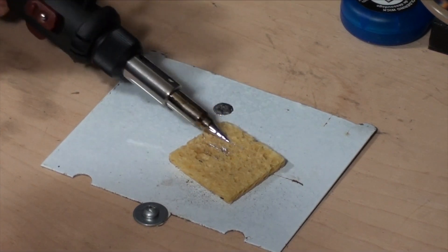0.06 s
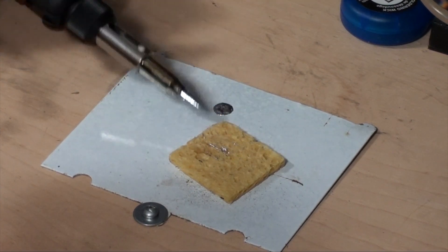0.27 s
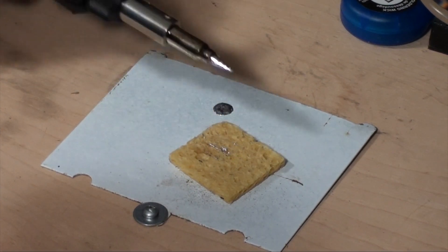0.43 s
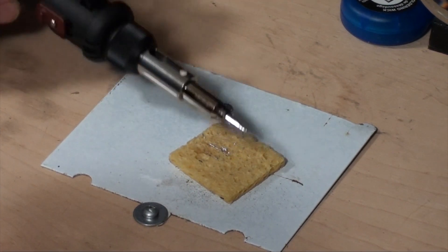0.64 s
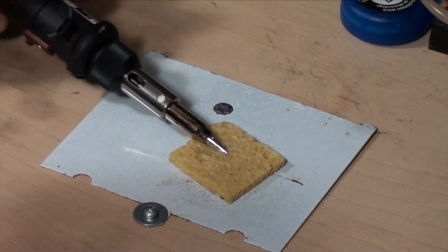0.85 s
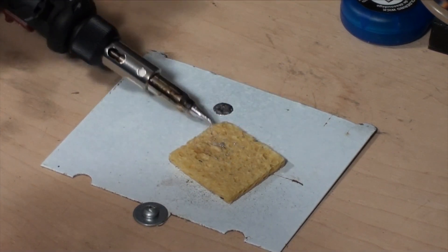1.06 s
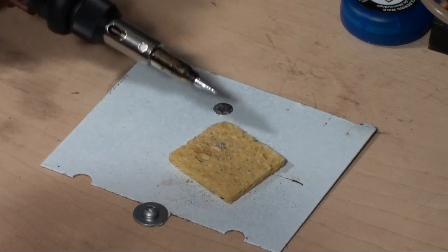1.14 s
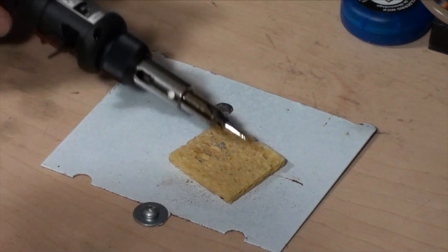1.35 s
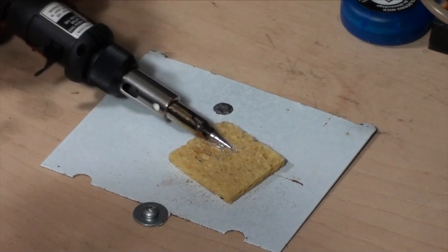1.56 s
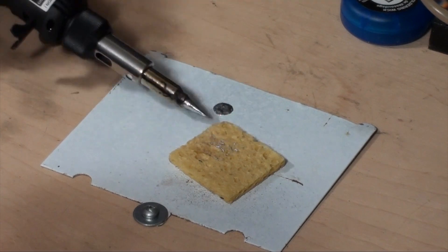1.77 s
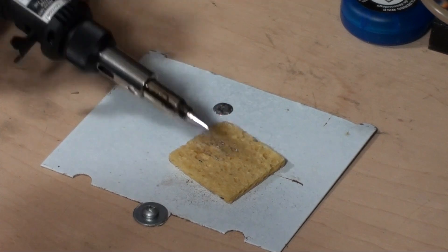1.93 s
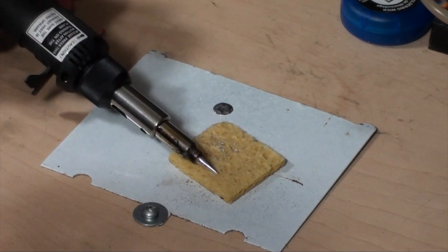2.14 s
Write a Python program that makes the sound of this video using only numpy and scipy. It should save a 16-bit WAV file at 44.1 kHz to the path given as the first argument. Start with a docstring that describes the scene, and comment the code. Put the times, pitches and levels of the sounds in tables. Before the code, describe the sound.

A hot soldering iron tip sizzles on a damp sponge, close up in a small, dry room. The first wipe ends at 0.2 seconds with a sharp, briefly ringing metal knock and a low workbench thump. Sizzling returns from 0.8 to 1.1 with tiny spits, louder from 1.45 to 1.75 with soft rubbing, and briefly at 2.1. A gas burner hisses and hums faintly throughout.

```python
"""Water sizzles into steam as the hot tip of a gas soldering iron is wiped four times over a damp sponge.
Thousands of tiny bursts make the sizzle; single drops spit, and the tip rubs through the third stroke.
After the first stroke the tip slips off and knocks on the plate under the sponge: iron and plate ring,
and the workbench thumps. The burner hisses and hums faintly throughout, in a small, dry room."""
import sys
import numpy as np
from scipy import signal
from scipy.fft import rfft, irfft
from scipy.io import wavfile
from scipy.ndimage import uniform_filter1d

SR = 44100
rng = np.random.default_rng(int(sys.argv[2]) if len(sys.argv) > 2 else 0)


def unload_audio(sound):
    """Save the sound as a 16-bit wav file, at the path given as the first command line argument."""
    columns = np.transpose(np.atleast_2d(sound))
    # keep every value between -1 and 1, then stretch to whole-number steps
    steps = np.round(np.clip(columns, -1, 1) * 32767)
    wavfile.write(sys.argv[1], SR, steps.astype(np.int16))


N = 97020

# The tip's contacts with the plate, a graze and then the blow. Each row: start in seconds, gain in dB.
KNOCK_CONTACTS = [(.2212, -26), (0.2251, -7), (0.2249, 2.5)]
BLOW_S = KNOCK_CONTACTS[-1][0]


def undb(db):
    """Decibels to gain."""
    return 10 ** (np.asarray(db) / 20)


def unit(x):
    """Scale to rms 1."""
    return x / np.sqrt(np.mean(x ** 2))


def since(start):
    """Seconds since a moment, zero before it."""
    return np.maximum(np.arange(N) / SR - start, 0)


def fade(start, t60):
    """Sudden onset and exponential decay."""
    return (since(start) > 0) * np.exp(-np.log(1000) * since(start) / t60)


def curve(points):
    """Join (seconds, value) points by straight lines."""
    return np.interp(since(0), *np.array(points).T)


def drift(rate_hz):
    """Smooth random movement; rms 1."""
    span = max(int(SR / rate_hz), 2)
    return unit(uniform_filter1d(uniform_filter1d(rng.standard_normal(N), span), span))


def colour(x, points, peaks=()):
    """EQ a sound by (Hz, dB) points plus (centre Hz, width Hz, dB) resonances; rms 1."""
    freqs = np.maximum(np.fft.rfftfreq(N, 1 / SR), 1)
    hz, db = np.array(points).T
    power = undb(np.interp(np.log(freqs), np.log(hz), db)) ** 2
    for centre, width, peak_db in peaks:
        power += undb(peak_db) ** 2 / (1 + ((freqs - centre) / width) ** 2 * 2) ** 2
    return unit(irfft(rfft(x) * np.sqrt(power), N))


def band(hz, width_hz):
    """Noise in one resonance; rms 1."""
    b, a = signal.iirpeak(hz, hz / width_hz, fs=SR)
    return unit(signal.lfilter(b, a, signal.lfilter(b, a, rng.standard_normal(N))))


def ring(modes, start):
    """Decaying modes set off at one moment."""
    phases = 2 * np.pi * rng.random(len(modes))
    return sum(undb(db) * fade(start, t60) * np.sin(2 * np.pi * hz * since(start) + phase)
               for (hz, db, t60), phase in zip(modes, phases))


def room(x, pan_db):
    """Panned direct sound plus the short, duller wash of the room in each ear."""
    lag_s, top_hz, wash_db = 0.0067, 5600, -19
    b, a = signal.butter(1, top_hz, fs=SR)
    tails = signal.lfilter(b, a, rng.standard_normal((2, N))) * fade(lag_s, t60=0.14)
    wash = signal.fftconvolve(np.atleast_2d(x), unit(tails) / np.sqrt(N), axes=1)[:, :N]
    return x * undb(np.array([[pan_db], [-pan_db]]) / 2) + undb(wash_db) * wash


def gas_hiss():
    """Even gas hiss in the middle over diffuse room noise."""
    # EQ of the centre and of the sides. Each row: frequency in Hz, relative level in dB.
    mid_eq = [(20, -7), (45, -12.5), (150, -8), (300, -9.5), (520, -10), (700, -11.5), (1000, -12),
              (2300, -15), (3000, -16), (5400, -14.5), (10000, -18), (15500, -18)]
    side_eq = [(25, -33), (120, -18), (260, -9.5), (600, -7), (1200, -9), (2500, -13.5), (5000, -19.5),
               (9000, -24), (15000, -44)]
    mid = undb(-57) * colour(rng.standard_normal(N), mid_eq)
    side = undb(-62.5) * colour(rng.standard_normal(N), side_eq)
    return np.array([mid + side, mid - side])


def burner_hum():
    """A faint, slightly wavering tone and its third harmonic, like a closed pipe."""
    # The two partials. Each row: frequency in Hz, base level in dB.
    partials = [(839.4, -69), (2517.4, -68.5)]
    # Swell of the lower partial. Each row: time in seconds, gain in dB.
    swell = [(0, -11), (.4, -1.5), (1.3, 2.5), (2.2, 1)]
    pitch_wander, waver_db = 0.00103, -0.9
    clock = np.cumsum(1 + pitch_wander * drift(rate_hz=4.5)) / SR
    low, high = (undb(db + waver_db * drift(rate_hz=13)) * np.sqrt(2) * np.sin(2 * np.pi * hz * clock)
                 for hz, db in partials)
    return low * undb(curve(swell)) + high


def bench_thump():
    """The bench answers the knock with a low thump that builds over a few milliseconds."""
    # Modes of the bench. Each row: frequency in Hz, level in dB, T60 in seconds.
    bench_modes = [(144, -34.5, 0.18), (132, -53, 0.19), (113.7, -56, 0.6), (61.6, -56, .2)]
    lag_s, rise_s = 0.0024, 0.013
    start = BLOW_S + lag_s
    return ring(bench_modes, start) * (1 - np.exp(-since(start) / rise_s))


def contact_crack():
    """Each contact of tip and plate is a snap of bright noise, slightly different in each ear."""
    # EQ of the crack. Each row: frequency in Hz, relative level in dB.
    crack_eq = [(300, -35), (1100, -21), (1800, -53), (2300, -8), (2900, -17), (3200, -35), (3600, -11),
                (4800, -7), (5200, -22), (7500, -20), (9000, -25), (11200, -24), (13300, -13), (16000, -27)]
    # Its broad resonances. Each row: centre in Hz, width in Hz, relative level in dB.
    crack_peaks = [(4220, 420, -1.5), (5470, 210, -15), (6430, 450, 4.5), (8420, 290, 6), (9470, 150, -15),
                   (10100, 430, -5), (12130, 260, -9)]
    trim_db, side_db = -18, -17
    mid, side = (colour(rng.standard_normal(N), crack_eq, crack_peaks) for _ in range(2))
    stereo = mid + undb(side_db) * side * np.array([[1], [-1]])
    return stereo * sum(undb(db + trim_db) * fade(start, t60=0.016) for start, db in KNOCK_CONTACTS)


def knock():
    """The tip cracks on the plate; the iron rings and rattles briefly, and the plate clacks hollowly."""
    # EQ of the rattle. Each row: frequency in Hz, relative level in dB.
    rattle_eq = [(300, -32.5), (550, -10.5), (750, -20.5), (1400, -4), (1900, -16.5), (3200, -6.5),
                 (3700, -4), (5000, -13), (5900, -5.5), (6400, 4), (7500, -10.5), (8300, -2.5), (9100, -20),
                 (10400, -4), (11300, -19), (12300, -13), (16000, -30)]
    # Modes of the iron and of the plate. Each row: frequency in Hz, relative level in dB, T60 in seconds.
    iron_modes = [(3650, -31.5, .06), (4135, -31.5, 0.064), (4810, -34.5, 0.086), (5260, -43.5, 0.17),
                  (5590, -34, 0.11), (6342, -33, .15), (6534, -36.5, 0.15), (6790, -43, .07),
                  (7840, -33, 0.085), (8400, -34.5, 0.11), (8360, -25, .055), (9380, -33.5, 0.067),
                  (10350, -34, 0.085), (12400, -38, 0.052)]
    plate_modes = [(532, -53, 0.32), (593, -39.5, 0.054), (939, -42.5, 0.097), (1020, -46.5, 0.044),
                   (1140, -38, 0.04), (1260, -43.5, 0.052), (1422, -46.5, 0.086), (1460, -41.5, 0.13),
                   (2164, -44, 0.056), (2450, -37.5, 0.043), (2827, -42.5, .04)]
    plate_lag_s = 0.00099
    crack = contact_crack()
    rattle = colour(rng.standard_normal(N), rattle_eq) * undb(-31) * fade(BLOW_S, t60=0.22)
    punch = 1 + undb(8.5) * fade(BLOW_S, t60=0.017)  # the iron rings louder for the first moment
    iron = undb(-1.5) * ring(iron_modes, BLOW_S) * punch
    plate = undb(0.5) * ring(plate_modes, BLOW_S + plate_lag_s)
    return crack + rattle + iron + plate


def sponge_rub():
    """The tip catches on the pores of the sponge as it drags through the third stroke."""
    # Envelope of the drag. Each row: time in seconds, level in dB.
    drag = [(1.52, -76), (1.56, -52.5), (1.62, -58), (1.72, -62), (1.77, -83)]
    # EQ of the rubbing. Each row: frequency in Hz, relative level in dB.
    rub_eq = [(300, -15), (800, -5.5), (3000, -4), (6000, -12)]
    # Its resonances. Each row: centre in Hz, width in Hz, relative level in dB.
    rub_peaks = [(985, 150, -1.8), (2400, 110, 1), (2970, 190, -1.4)]
    catches_per_s = 2700
    catches = (rng.random(N) < catches_per_s / SR) * rng.standard_normal(N)
    return colour(catches, rub_eq, rub_peaks) * undb(curve(drag))


def sponge_pats():
    """Soft pats as the tip meets or leaves the sponge."""
    # Each row: start in seconds, level in dB.
    pats = [(.787, -48.5), (1.452, -46), (1.748, -48.5)]
    return band(2450, width_hz=1700) * sum(undb(db) * fade(start, t60=0.024) for start, db in pats)


def spit_and_fizz():
    """Single drops spit, and the last water fizzes off the lifted tip."""
    # Spits. Each row: start in seconds, level in dB, centre in Hz, width in Hz, T60 in seconds.
    drops = [(0.61, -50, 5440, 900, 0.014), (.787, -44, 7540, 4000, 0.021), (0.997, -35, 5040, 1600, 0.017),
             (1.4513, -37, 8170, 2000, 0.0076)]
    # Fizzes. Each row: peak time in seconds, level in dB, half length in seconds.
    fizzes = [(0.453, -63, 0.011), (1.23, -62, 0.019), (1.32, -62, .035)]
    spits = sum(undb(db) * fade(start, t60) * band(hz, width) for start, db, hz, width, t60 in drops)
    fizz_level = sum(undb(db) * np.exp(-((since(0) - peak) / half) ** 2) for peak, db, half in fizzes)
    return spits + band(8200, width_hz=3100) * fizz_level


def sizzle():
    """Thousands of tiny steam bursts a second, as loud as the tip presses into wet sponge."""
    # One steam envelope per stroke. Each point: time in seconds, relative level in dB.
    strokes = [
        [(-.01, -51.5), (.036, -53.5), (.066, -52), (.11, -44.5), (.15, -49.5), (.19, -55), (.222, -54)],
        [(.787, -55), (.802, -49.5), (.835, -61), (.858, -50.5), (.89, -52), (.92, -46.5), (.945, -51.5),
         (.995, -44), (1.02, -49.5), (1.06, -50), (1.11, -64)],
        [(1.452, -45.5), (1.5, -50), (1.535, -48.5), (1.565, -41.5), (1.61, -41), (1.69, -45.5), (1.73, -51),
         (1.76, -62)],
        [(2.103, -46.5), (2.122, -47.5), (2.15, -49), (2.21, -46.5)],
    ]
    # EQ of the steam. Each row: frequency in Hz, relative level in dB.
    steam_eq = [(300, -29), (900, -28), (1900, -18), (2600, -11.5), (3300, -15.5), (4200, -3.5),
                (5700, -5.5), (8000, -1.5), (10000, -6), (12500, -6.5), (14000, -11), (16000, -11.5)]
    # Resonances at the tip. Each row: centre in Hz, width in Hz, relative level in dB.
    tip_peaks = [(4360, 250, -2), (4840, 330, 2.5), (5420, 110, 1.5), (6410, 450, 0), (7500, 280, -9),
                 (8900, 250, 0), (11080, 500, -2)]
    bursts_per_s, spread_db = 17000, 2
    attack_s, release_s = 0.0011, 0.0049
    trim_db, flutter_db = 1, 0.5
    clicks = (rng.random(N) < bursts_per_s / SR) * rng.choice([-1, 1], N)
    bursts = clicks * undb(spread_db * rng.exponential(size=N))
    contact = np.zeros(N)
    for stroke in strokes:
        touch, lift = stroke[0][0], stroke[-1][0]
        attack = np.minimum(since(touch) / attack_s, 1)
        release = np.exp(-since(lift) / release_s)
        contact += undb(curve(stroke)) * attack * release
    flutter = undb(trim_db + flutter_db * drift(rate_hz=150))
    return colour(bursts, steam_eq, tip_peaks) * contact * flutter


def scene():
    """Wiping and knock up close, over the burner."""
    wiping = room(sizzle() + sponge_rub() + spit_and_fizz() + sponge_pats(), pan_db=-0.5)
    slip = room(knock(), pan_db=-0.5) + bench_thump()
    return wiping + slip + burner_hum() + gas_hiss()


def record(dry):
    """A steep low-pass takes off the very top."""
    top_hz = 15700
    return signal.sosfilt(signal.ellip(10, .1, 70, top_hz, fs=SR, output="sos"), dry)


dry = scene()
out = record(dry)
unload_audio(out)
```